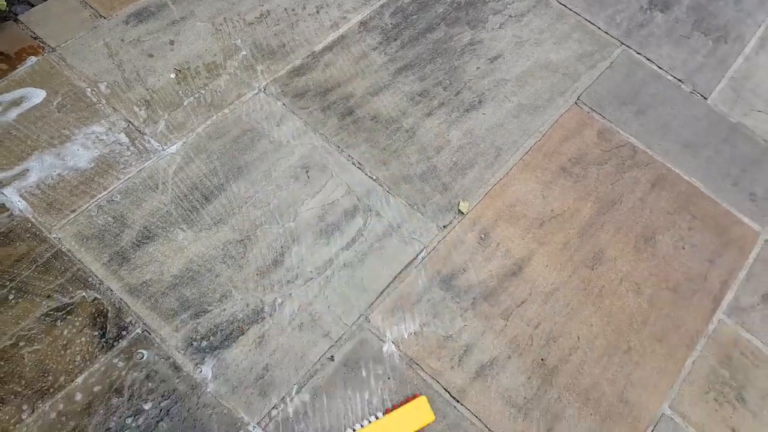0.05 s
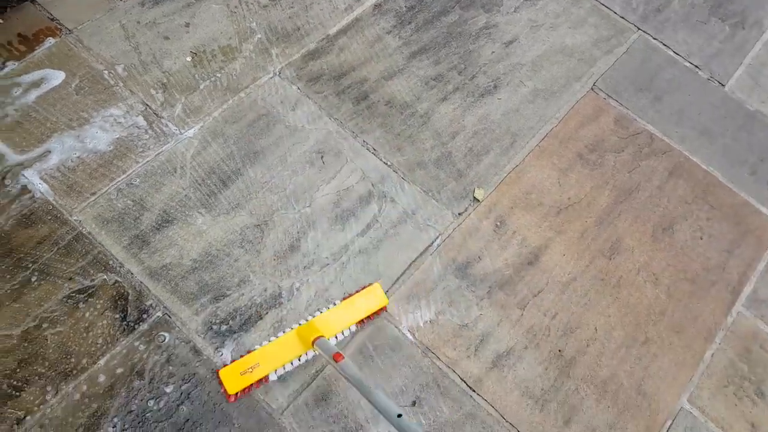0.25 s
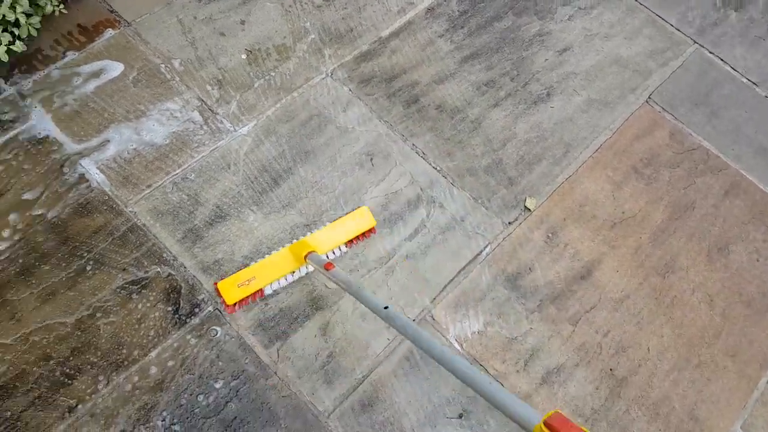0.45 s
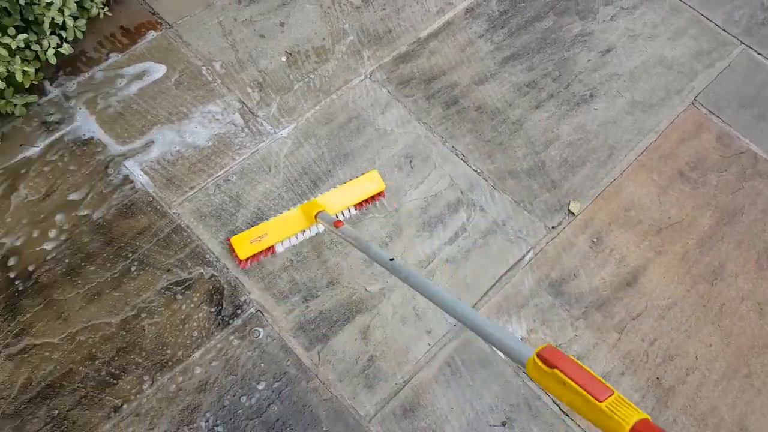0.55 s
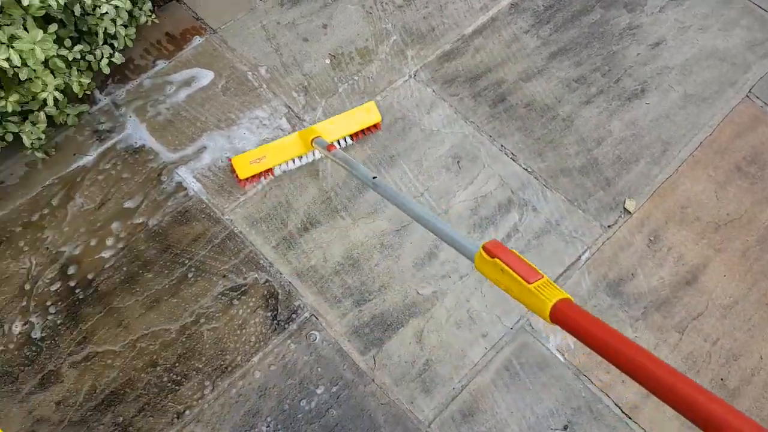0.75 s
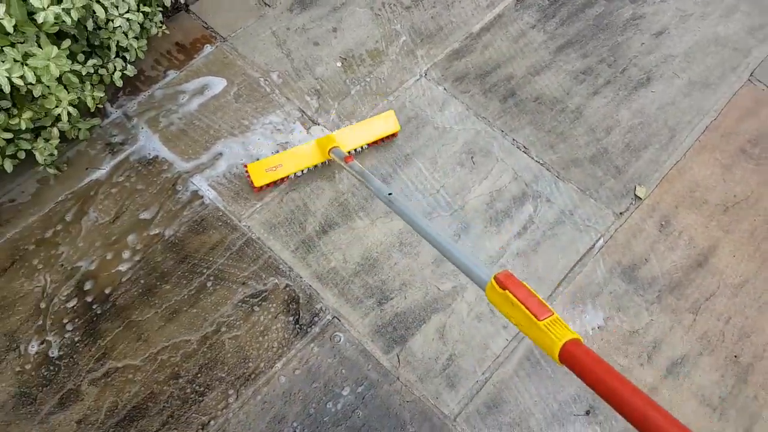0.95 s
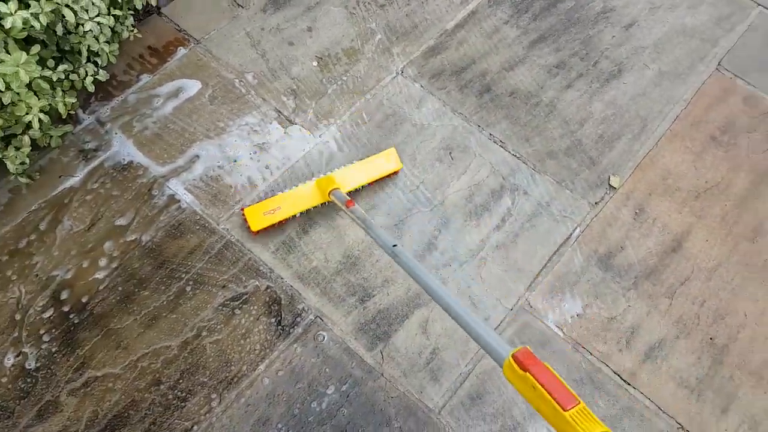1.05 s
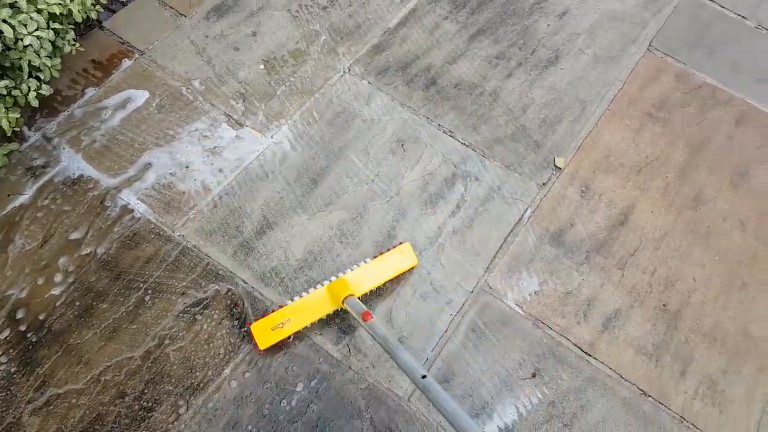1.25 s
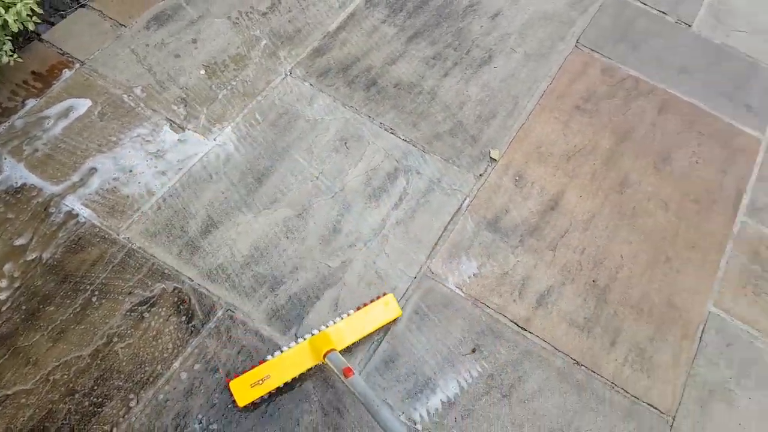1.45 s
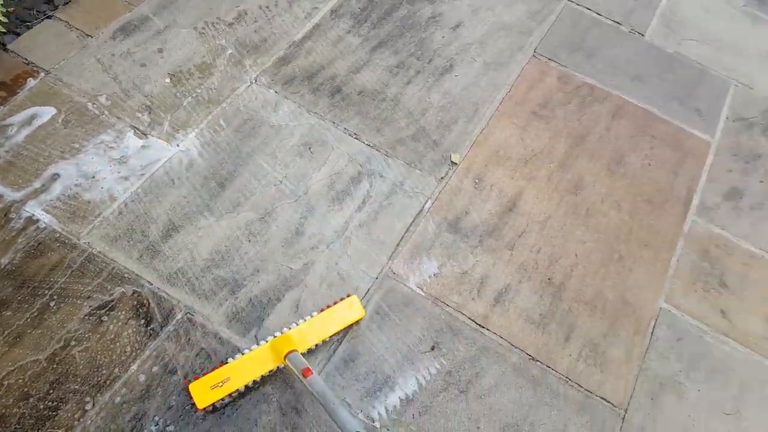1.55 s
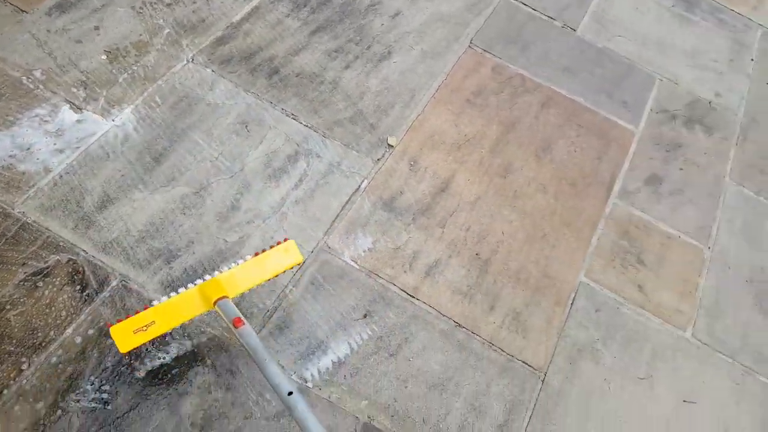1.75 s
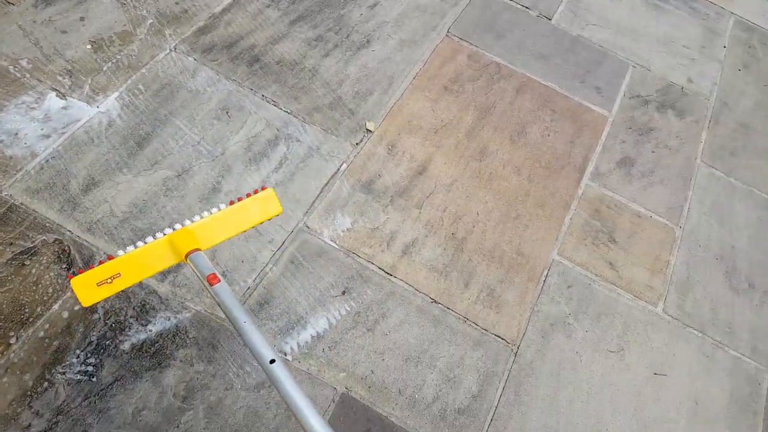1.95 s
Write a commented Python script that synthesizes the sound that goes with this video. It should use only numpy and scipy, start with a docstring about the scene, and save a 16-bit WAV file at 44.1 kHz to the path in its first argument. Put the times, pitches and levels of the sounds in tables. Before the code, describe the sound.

A stiff brush scrapes wet paving in long raspy strokes, push then pull, over faint traffic

```python
"""Wet paving, far traffic: a stiff brush ends a pull, pushes long away, then pulls back and dies out.
Bristle tips slip on the grit: random slips are filtered into a bright hiss and a rasp of two
moving resonances that sink as the head moves off. Damped modes make the ticks of head and drops.
Shaped noise with a wandering drone is the traffic; tyre noise swells at the very end."""
import sys
import numpy as np
from scipy import signal
from scipy.fft import rfft, irfft, next_fast_len
from scipy.io import wavfile
from scipy.ndimage import uniform_filter1d, map_coordinates

SR = 44100
rng = np.random.default_rng(int(sys.argv[2]) if len(sys.argv) > 2 else 0)


def persist_wave(psi):
    """Save psi, clipped to +-1, as 16-bit WAV."""
    counts = np.round(np.clip(psi, -1, 1) * 32767).astype(np.int16)
    wavfile.write(sys.argv[1], SR, np.atleast_2d(counts).T)


N = 89082
T_S = np.arange(N) / SR
SIDES = np.array([[1], [-1]]) / 2  # splits a left-over-right dB or delay between the channels


def amp(db):
    """Decibels to amplitude ratio."""
    return 10 ** (np.asarray(db) / 20)


def unit(x):
    """Scale to RMS 1."""
    return x / np.sqrt(np.mean(x ** 2) + 1e-20)


def along(points, hz):
    """Interpolate (freq_hz, value) points on a log frequency axis."""
    freq_hz, value = np.transpose(points)
    return np.interp(np.log(hz + 1), np.log(freq_hz + 1), value)


def wobble(knots_per_s):
    """Smooth random curve through normal-distributed knots."""
    knots = rng.standard_normal(int(N * knots_per_s / SR) + 4)
    return map_coordinates(knots, [np.arange(N) * knots_per_s / SR])


def filtered(x, response):
    """Apply a complex frequency response to the zero-padded spectrum."""
    size = next_fast_len(N + SR // 2)
    spectrum = rfft(x, size) * response(np.fft.rfftfreq(size, 1 / SR))
    return irfft(spectrum, size)[..., :N]


def stereo(pair, alike):
    """Mix two unrelated signals as mid and side to a left-right correlation per frequency."""
    def mid_side(hz):
        angle = np.arccos(np.clip(along(alike, hz), -1, 1)) / 2
        return np.array([np.cos(angle), np.sin(angle)])

    mid, side = filtered(pair, mid_side)
    return np.array([mid + side, mid - side])


PATCHY_DB = 1.5  # RMS


def moving(pair, gain):
    """Time-varying filter, with random gain patches smoothed over frequency and time."""
    hz, now_s, bins = signal.stft(pair, SR, nperseg=1024)
    field = uniform_filter1d(rng.standard_normal(bins.shape[1:]), size=3, axis=0)
    field = uniform_filter1d(field, size=5, axis=1)
    bins = bins * gain(hz[:, None], now_s[None]) * amp(PATCHY_DB * unit(field))
    return signal.istft(bins, SR, nperseg=1024)[1][:, :N]


SLIPS_PER_S, SLIP_SPREAD_DB = 12000, 2
SMOOTH_SHARE = 0.89  # share of power


def slips():
    """Bristle tips let go at random moments with scattered force, over a smooth film of water."""
    hit = rng.random((2, N)) < SLIPS_PER_S / SR
    force_db = SLIP_SPREAD_DB * np.clip(rng.standard_normal((2, N)), -2, 2)
    sign = np.sign(rng.standard_normal((2, N)))
    film = rng.standard_normal((2, N))
    grains = unit(hit * amp(force_db) * sign)
    return np.sqrt(1 - SMOOTH_SHARE) * grains + np.sqrt(SMOOTH_SHARE) * film


# Bristle-tip spectrum, relative: freq_hz, density_db_per_hz
HISS_SPECTRUM = [(250, -38), (450, -18), (1100, -17.5), (1500, -13.5), (2500, -11), (3700, -3.5),
                 (4500, -5), (5500, -5), (6500, -2.5), (7600, -2), (8350, 2), (9300, -3), (10700, -2.5),
                 (12000, -4), (13400, -3.5), (15300, -7.5)]


def hiss():
    """Slips through the fixed bright spectrum of the bristle tips, at RMS 1."""
    return unit(moving(slips(), lambda hz, now_s: amp(along(HISS_SPECTRUM, hz))))


# Rasp resonances: start_s, low_hz, low_db, high_hz, high_db (dB relative to the hiss)
RASP_PATH = [(0, 2120, -13, 2860, -6), (.12, 1680, -8.5, 2670, -7.5), (.2, 1750, -12.5, 2760, -7.5),
             (.28, 2330, -8, 3030, -12.5), (.42, 2420, -7, 3470, -12.5), (.52, 2120, -4.5, 3340, -28),
             (.6, 2110, -4, 3370, -10.5), (.68, 1700, -7.5, 3280, -9), (.76, 1780, -9, 2770, -9.5),
             (.85, 1540, -10.5, 2730, -7), (.98, 1490, -12.5, 2560, -6.5), (1.1, 1630, -15, 2820, -10.5),
             (1.2, 1630, -23, 2860, -12.5), (1.35, 1840, -18, 3180, -12.5), (1.45, 2320, -11, 2960, -19),
             (1.6, 2360, -15.5, 3000, -6.5)]
RASP_WIDTH = 0.49  # bandwidth over centre, before the peak is raised to 1.84
HEAD_EDGE_HZ = 1230  # the small head radiates little below this


def rasp():
    """Slips excite two wide, moving resonances of the head."""
    start_s, low_hz, low_db, high_hz, high_db = np.transpose(RASP_PATH)

    def peak(hz, now_s, centre_hz, level_db):
        centre = np.interp(now_s, start_s, centre_hz)
        ratio = hz / centre
        bandpass = RASP_WIDTH * ratio / np.abs(1 - ratio * ratio + 1j * RASP_WIDTH * ratio)
        power_makeup = np.sqrt(SR / 2 / (centre * RASP_WIDTH))
        return amp(np.interp(now_s, start_s, level_db)) * bandpass ** 1.84 * power_makeup

    def resonances(hz, now_s):
        low_cut = 1 / (1 + (HEAD_EDGE_HZ / (hz + 1)) ** 12)
        return low_cut * np.hypot(peak(hz, now_s, low_hz, low_db), peak(hz, now_s, high_hz, high_db))

    return moving(slips(), resonances)


# Stroke: start_s, hiss_level_db, left_over_right_db (its mean is removed)
STROKE_PATH = [(0, -31.5, 1), (.13, -32.5, 2), (.17, -35.5, 0), (.198, -39, 1), (.212, -46.5, 1),
               (.25, -47, 3), (.268, -40, 5), (0.283, -31, 3), (.31, -29.5, 3.5), (.38, -26, 4),
               (.46, -26, 5.5), (.51, -27.5, 5.5), (.55, -25, 6), (.65, -26, 8), (.79, -25.5, 5),
               (.86, -27, 4.5), (.93, -31, 8), (.99, -35, 1), (1.012, -45.5, 2), (1.05, -45, 3),
               (1.068, -53.5, 7), (1.087, -53, 11), (1.1, -39, 1), (1.13, -34, 3), (1.152, -28.5, 3),
               (1.22, -27.5, 4), (1.391, -27.5, 4.5), (1.422, -33, 3), (1.445, -26.5, 4), (1.478, -28.5, 3),
               (1.505, -34, 4), (1.56, -34, 0), (1.59, -40.5, 22), (1.63, -43, -1.5), (1.69, -50.5, 2),
               (1.74, -55, 4), (1.79, -71, 10)]
# Left-right correlation: freq_hz, likeness
BRUSH_LIKENESS = [(700, .8), (1700, .8), (2600, .65), (3500, .35), (4500, .2), (8000, .05)]
# Left-right balance: freq_hz, left_over_right_db
BRUSH_SHADING = [(700, 3), (1400, 6), (2200, 6), (3600, 4), (4500, 1), (5200, -1), (7600, -1), (8600, 2),
                 (9600, 9), (11400, 5), (12100, 5), (12800, 1), (14100, -2), (15000, -3)]
FLUTTER_DB, FLUTTER_KNOTS_PER_S = 0.5, 13.5
END_FADE_DB_PER_S = 200
LEFT_LEAD_S = 6e-5


def brush():
    """One stroke level drives hiss and rasp; balance and lead place them left to right."""
    start_s, hiss_db, pan_db = np.transpose(STROKE_PATH)
    level_db = np.interp(T_S, start_s, hiss_db) + FLUTTER_DB * wobble(FLUTTER_KNOTS_PER_S)
    level_db -= END_FADE_DB_PER_S * np.clip(T_S - start_s[-1], 0, 1)
    pan = amp(SIDES * (np.interp(T_S, start_s, pan_db) - pan_db.mean()))
    panned_hiss = pan * stereo(hiss(), BRUSH_LIKENESS)
    both = amp(level_db) * (panned_hiss + stereo(rasp(), BRUSH_LIKENESS))

    def placement(hz):
        lead = np.exp(2j * np.pi * hz * SIDES * LEFT_LEAD_S)
        return amp(SIDES * along(BRUSH_SHADING, hz)) * lead

    return filtered(both, placement)


# Rumble spectrum, relative: freq_hz, density_db_per_hz
RUMBLE_SPECTRUM = [(15, -32), (30, -14.5), (55, -6.5), (100, -7), (150, -2), (220, -3), (290, -10.5),
                   (355, -5.5), (470, -13), (600, -14.5), (1000, -18), (2500, -28), (3500, -42.5),
                   (5000, -41.5), (8500, -43), (10000, -49.5), (15700, -58)]
# Tyre spectrum, relative: freq_hz, density_db_per_hz
TYRE_SPECTRUM = [(700, -120), (900, 10.5), (1500, 4), (3300, -2.5), (4500, -20), (5500, -120)]
# Left-right correlation: freq_hz, likeness
TRAFFIC_LIKENESS = [(30, .8), (80, .87), (130, .98), (220, .985), (380, .92), (700, .65), (1300, .2),
                    (3000, 0)]
# Wandering boosted band: start_s, centre_hz
DRONE_PATH = [(0, 158), (.5, 160), (.8, 159), (1.05, 236), (1.25, 215), (1.5, 188), (2.02, 170)]
DRONE_DB, DRONE_WIDTH_HZ = 4, 55
RUMBLE_DB, RUMBLE_WOBBLE_DB, RUMBLE_KNOTS_PER_S = -38.5, 0.62, 4.98
TYRES_END_DB, TYRES_RISE_DB_PER_S = -47.5, 84


def traffic():
    """Shaped noise: a far rumble whose drone wanders, and tyre noise climbing to the end."""
    def drone(hz, now_s):
        offset = (hz - np.interp(now_s, *np.transpose(DRONE_PATH))) / DRONE_WIDTH_HZ
        return amp(DRONE_DB * np.exp(-offset ** 2))

    def shaped(spectrum):
        noise = stereo(moving(rng.standard_normal((2, N)), drone), TRAFFIC_LIKENESS)
        return unit(filtered(noise, lambda hz: amp(along(spectrum, hz))))

    rumble_db = RUMBLE_DB + RUMBLE_WOBBLE_DB * wobble(RUMBLE_KNOTS_PER_S)
    tyres_db = TYRES_END_DB - TYRES_RISE_DB_PER_S * (N / SR - T_S)
    return amp(rumble_db) * shaped(RUMBLE_SPECTRUM) + amp(tyres_db) * shaped(TYRE_SPECTRUM)


# Ticks: start_s, level_db (first mode, before its onset), pitch_hz, t60_s, left_over_right_db
TICK_EVENTS = [(0.226, -29, 1560, 0.009, 11), (0.333, -28.5, 733, 0.019, -1), (.357, -35.5, 540, 0.045, -2),
               (1.696, -46.5, 1810, 0.062, 16), (1.801, -56, 8200, .012, -3), (1.870, -51, 8600, 0.012, -6)]
OVERTONE_RATIO, OVERTONE_DB = 1.5, -7  # second mode over the first
TICK_ONSET_S, TICK_NOISE = 0.00017, 0.05


def ticks():
    """Clicks of the head and of drops: two damped modes and a little noise, cut at 50 ms."""
    out = np.zeros((2, N + SR))
    t_s = np.arange(SR // 20) / SR
    for start_s, level_db, pitch_hz, t60_s, pan_db in TICK_EVENTS:
        ring = np.sin(2 * np.pi * pitch_hz * t_s)
        ring += amp(OVERTONE_DB) * np.sin(2 * np.pi * OVERTONE_RATIO * pitch_hz * t_s)
        ring += TICK_NOISE * rng.standard_normal(len(t_s))
        envelope = amp(level_db - 60 * t_s / t60_s) * (1 - np.exp(-t_s / TICK_ONSET_S))
        first = round(start_s * SR)
        out[:, first:first + len(t_s)] += amp(SIDES * pan_db) * envelope * ring
    return out[:, :N]


def scene():
    """Sum of the brush, the traffic and the ticks."""
    return brush() + traffic() + ticks()


TOP_HZ = 15760


def record(dry):
    """Band limit: nothing passes from TOP_HZ up."""
    return filtered(dry, lambda hz: hz < TOP_HZ)


dry = scene()
out = record(dry)
persist_wave(out)
```